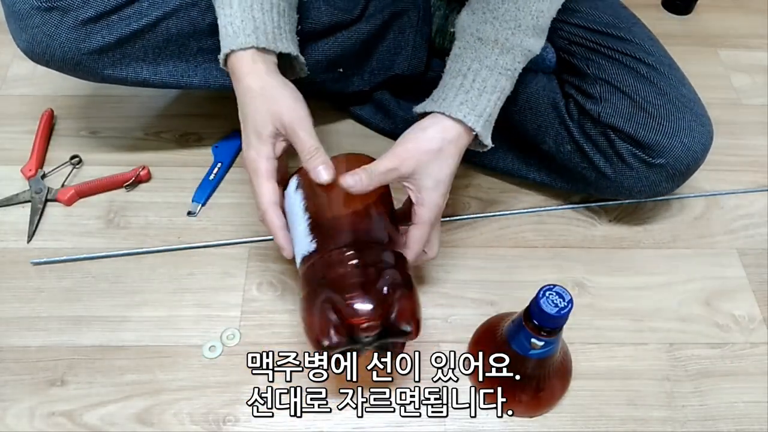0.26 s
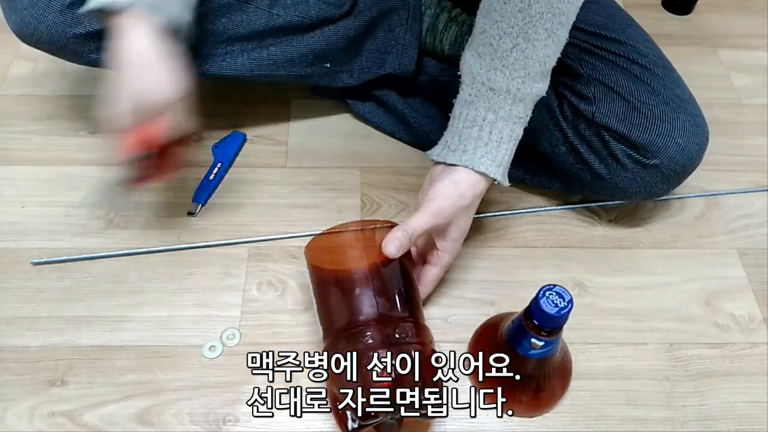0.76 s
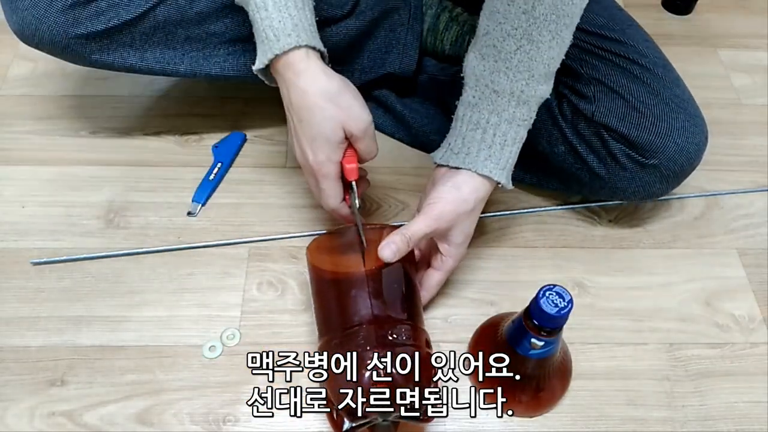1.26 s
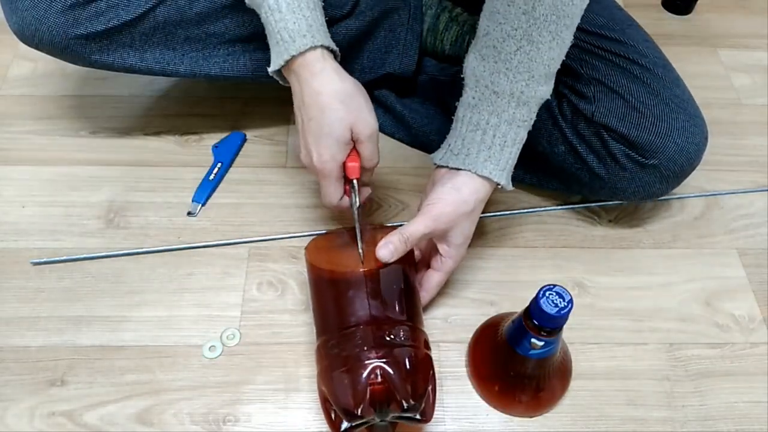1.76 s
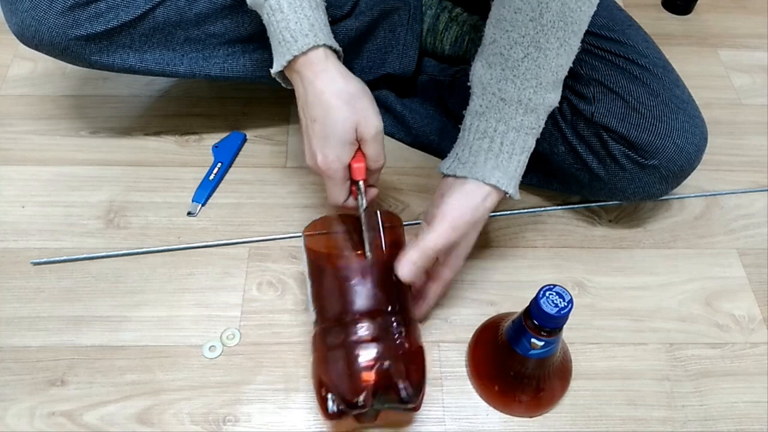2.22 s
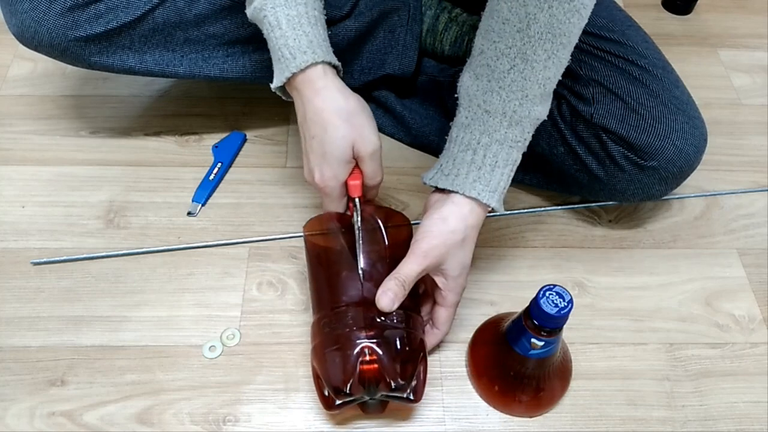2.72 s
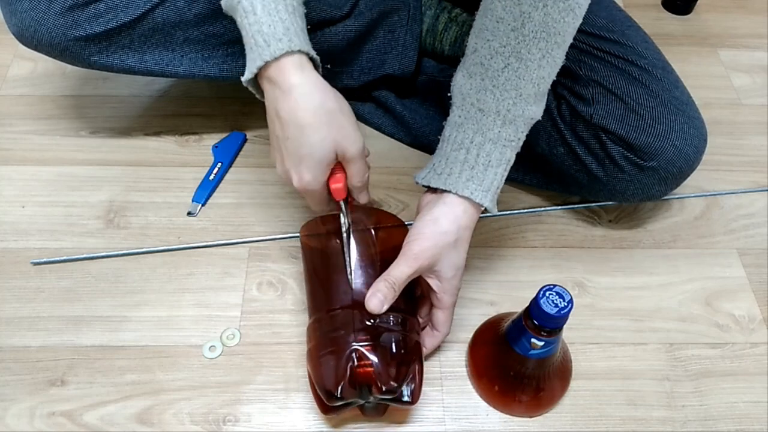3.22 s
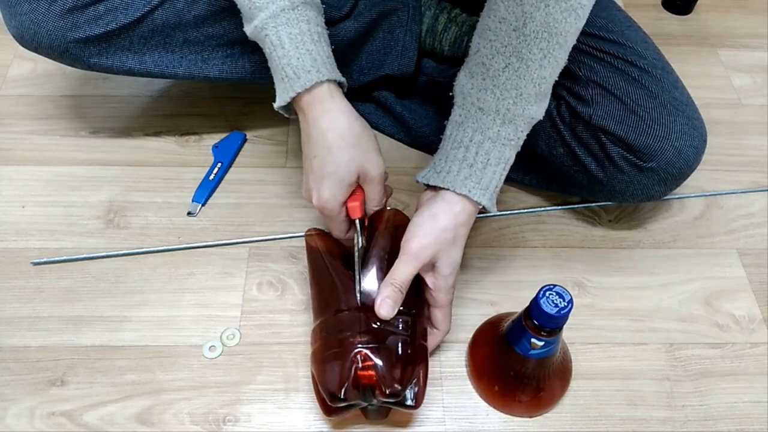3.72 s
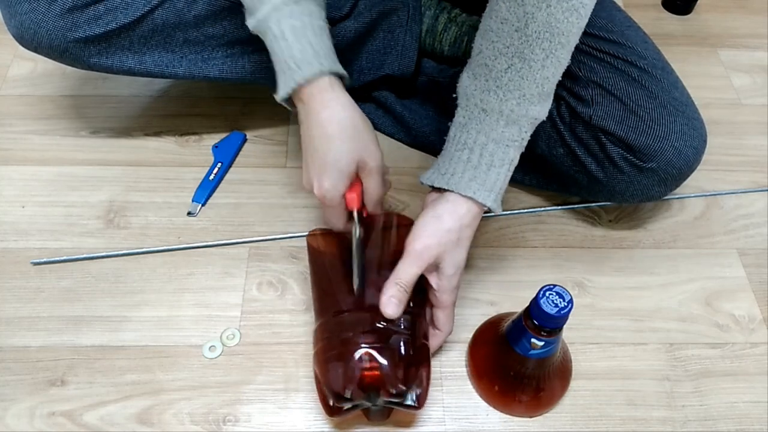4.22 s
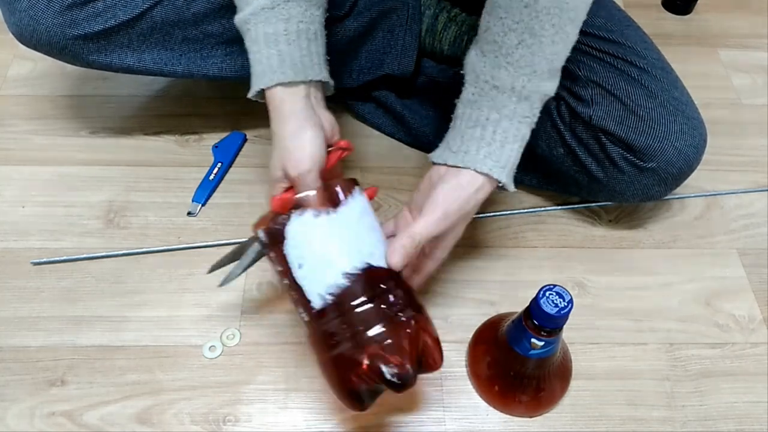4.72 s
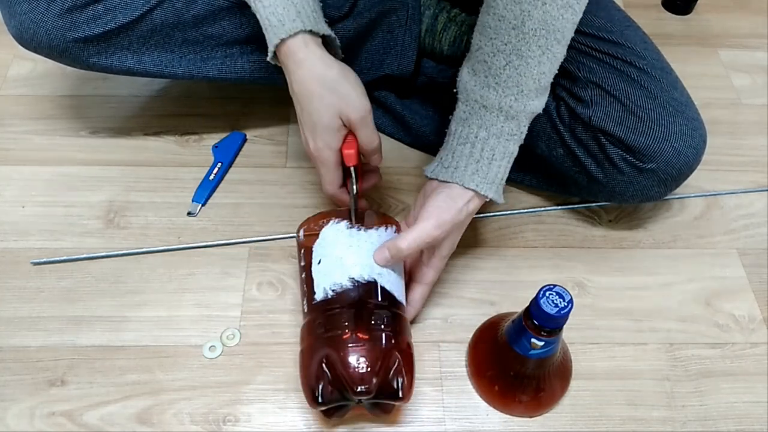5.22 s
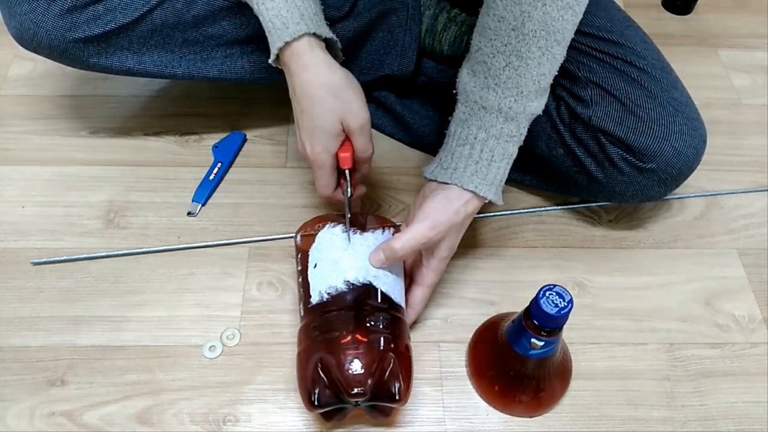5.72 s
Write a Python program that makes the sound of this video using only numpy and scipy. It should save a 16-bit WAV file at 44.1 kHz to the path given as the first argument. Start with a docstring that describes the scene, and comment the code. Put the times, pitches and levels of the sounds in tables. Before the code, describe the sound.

Shears clack, then tick and crackle through a hollow plastic bottle, ending in a hard snip before a second cut begins.

```python
"""A faint steady rush and hum come first, with a brief scuff; then shears clack and tap on plastic.
They slit an empty bottle lengthwise on the floor of a small room: slips tick at the blade and ring the air.
The thin wall snaps and crackles in noisy bursts shaped by its resonances, and sliding is catches over hiss.
A hard snip ends the cut; the shears are pulled out, the bottle is turned over and a second cut begins.
Levels are relative: layer gains follow in scene(). Short sounds are levelled by energy over one millisecond."""
import sys
import numpy as np
from scipy import signal
from scipy.fft import rfft, irfft, next_fast_len
from scipy.io import wavfile
from scipy.ndimage import uniform_filter1d

SR = 44100
rng = np.random.default_rng(int(sys.argv[2]) if len(sys.argv) > 2 else 0)


def put_to_file(sound):
    """Save the sound as 16-bit audio at rate SR, in the file named by the first command-line argument."""
    columns = np.atleast_2d(sound).T  # one column per channel
    safe = np.clip(columns, -1, 1)
    whole_steps = np.round(safe * 32767)
    wavfile.write(sys.argv[1], SR, whole_steps.astype(np.int16))


N = 263277
RING_SAMPLES = 6000  # length of every ring


def from_db(db):
    """Decibels to gain."""
    return 10 ** (np.asarray(db) / 20)


def unit(x):
    """Scale to an energy of one."""
    return x / np.sqrt(np.sum(x ** 2, axis=-1, keepdims=True) + 1e-20)


def at_hz(points, hz, axis=1):
    """Read a column of a table on a log-frequency axis."""
    points = np.array(points)
    return np.interp(np.log(hz + 1e-9), np.log(points[:, 0]), points[:, axis])


def band(x, low_hz, high_hz, order=3):
    """Causal band-pass."""
    edges_hz = [low_hz, min(high_hz, SR / 2 - 1000)]
    return signal.sosfilt(signal.butter(order, edges_hz, "band", fs=SR, output="sos"), x + 1e-18)


def stereo(mid, side, alike):
    """Two channels with a given correlation from two unrelated noises."""
    alike = np.clip(alike, -1, 1)
    return np.sqrt((1 + alike) / 2) * mid + np.sqrt((1 - alike) / 2) * side * np.array([[1], [-1]])


def aimed(x, lag_samples=.82, scatter_samples=.48):
    """Each contact radiates from its own spot and usually reaches the left side slightly later."""
    size = next_fast_len(len(x))
    lag = lag_samples + scatter_samples * rng.standard_normal()
    turns = np.arange(size // 2 + 1) / size * lag
    left = irfft(rfft(x, size) * np.exp(-2j * np.pi * turns), size)
    return np.array([left[:len(x)], x])


def add(out, s, sound):
    """Mix a sound into both channels at a time."""
    start = min(max(round(s * SR), 0), N)
    out[:, start:start + len(sound)] += aimed(sound)[:, :N - start]


def ringing(modes):
    """Damped waves of a set of modes after one push."""
    t = np.arange(RING_SAMPLES) / SR
    return sum(from_db(db - 60 * t / t60) * np.cos(2 * np.pi * hz * t) for hz, db, t60 in modes)


def panel(x, hz, lift_db, width):
    """The patch of wall under the contact lifts its own pitch; width is a share of that pitch."""
    r = np.exp(-np.pi * width * hz / SR)
    peak = np.array([1, 0, -1]) * (1 - r * r) / 2
    ring = signal.lfilter(peak, [1, -2 * r * np.cos(2 * np.pi * hz / SR), r * r], x)
    return x + (from_db(lift_db) - 1) * ring


PIVOT_HZ = 4400  # tilt leans the sound about this pitch


def tilted(level_db, tilt_db, parts):
    """Levels of the bottle's parts: a sharp contact favours the high ones, a blunt one the low."""
    power = np.abs(rfft(np.array(parts))) ** 2
    centre_hz = power @ np.linspace(0, SR / 2, power.shape[1]) / power.sum(axis=1)
    return level_db + tilt_db * np.log2(centre_hz / PIVOT_HZ)


# a burst is one clean push below this pitch and a flurry above it
SPLIT_HZ = 2300
LOWS, HIGHS = (signal.butter(5, SPLIT_HZ, kind, fs=SR, output="sos") for kind in ("low", "high"))


def burst(rise_ms):
    """The wall lets go: one clean push in the lows, a swelling and dying flurry of noise above."""
    size = 1024
    age = np.arange(size) * 1000 / SR / max(rise_ms, .1)  # in rise times
    spectrum = rfft(rng.standard_normal(size) * age * np.exp(-age), 2 * size)
    # even out the spectrum so that the resonances alone colour it
    smooth_power = uniform_filter1d(np.abs(spectrum) ** 2, size=15)
    flurry = unit(irfft(spectrum / np.sqrt(smooth_power + 1e-12))[:size])
    push = signal.unit_impulse(size, int(np.argmin(np.abs(age - 1)))) * rng.choice([-1, 1])
    jolt = signal.sosfilt(LOWS, push) + signal.sosfilt(HIGHS, flurry)
    return jolt * np.sqrt(SR / 1000)


def strike(rise_ms, levels_db, parts):
    """One burst drives several parts of the bottle."""
    return signal.fftconvolve(burst(rise_ms), from_db(levels_db) @ np.array(parts))


SNAP_RISE_MS = 0.42
# every snap or knock sets off a few weaker ones in neighbouring patches of wall
AFTER_GAP_S, AFTER_LOSS_DB, AFTER_OCTAVES = .007, 3, 0.37


def settling(s, hz, levels_db, parts, count=3):
    """The dying crackle of the wall after a jolt: rows of (time [s], sound)."""
    delays_s = np.cumsum(rng.exponential(AFTER_GAP_S, count))
    patches_hz = hz * 2 ** (AFTER_OCTAVES * rng.uniform(-1.4, 1, count))
    rows = []
    for k, (delay_s, patch_hz) in enumerate(zip(delays_s, patches_hz)):
        crackle = strike(SNAP_RISE_MS, levels_db - AFTER_LOSS_DB * k, parts)
        rows.append((s + delay_s, panel(crackle, patch_hz, lift_db=3.0, width=0.035)))
    return rows


# air in the open bottle: (frequency [Hz], level [dB], t60 [s])
HOLLOW_MODES = [(925, -11.5, 0.082), (1044, -14.5, 0.063), (1135.5, 0.5, 0.082), (1179, 1, 0.0352),
                (1249, -3, 0.056), (1294, -9.5, 0.06), (1410, -23, 0.12), (965, -3.5, 0.021)]
# the curved wall: (frequency [Hz], level [dB], t60 [s])
WALL_MODES = [(1456, -24, 0.096), (1570, -26.5, 0.062), (1743, -20.5, 0.069), (1954, -29.5, 0.065),
              (2080, -31, 0.084), (2385, -29.5, 0.057)]


def bottle():
    """Unit-energy answers to one push: thud, hollow air, wall, crack, fizz, and a treble mix of the last two."""
    push = signal.unit_impulse(RING_SAMPLES)
    thud = unit(band(push, 360, 630, order=1))
    hollow = band(ringing(HOLLOW_MODES), 600, 1500, order=2)
    wall_ring = band(ringing(WALL_MODES), 960, 5800, order=2)
    wall = unit(band(push, 1230, 3610) + from_db(-26.5) * wall_ring)
    crack = band(push, 3840, 8020)
    fizz = band(push, 9240, 14120)
    treble = unit(crack) + from_db(-4.0) * unit(fizz)
    return unit(np.array([thud, hollow, wall, crack, fizz, treble]))


# the whole shell, knocked from outside: (frequency [Hz], level [dB], t60 [s])
SHELL_MODES = [(649, -11, 0.031), (924, -7.5, 0.074), (1360, -16, 0.029), (890, 14, 0.0029)]


def shell_ring():
    """The whole shell answers a push from outside with a low, woody knock."""
    return unit(band(ringing(SHELL_MODES), 574, 1310, order=2))


# spectrum of the steady rush: (frequency [Hz], density [dB per Hz, relative])
RUSH_SPECTRUM = [(15, -69.5), (25, -44), (118, -18), (166, -5.5), (260, -3.5), (477, -9.5), (516, -3.5),
                 (573, -13), (786, -9), (851, -15.5), (1050, -9), (1690, -18.5), (1980, -18.5),
                 (3170, -21.5), (13500, -32.5)]
# left-right likeness of the rush: (frequency [Hz], correlation [-1 to 1])
RUSH_LIKENESS = [(50, .2), (130, 0.332), (280, 0.26), (600, 0.54), (1200, 0.547), (3000, 0.095),
                 (10000, 0.11)]
# faint hum lines: (frequency [Hz], level [dB])
HUM = [(224, -82.5), (255, -76), (511, -75.5)]


def background(rush_db, hum_db, waver):
    """A soft steady rush of shaped noise with a hum whose phase wanders slightly."""
    hz = np.arange(N // 2 + 1) * SR / N
    mid, side = rfft(rng.standard_normal((2, N))) * from_db(at_hz(RUSH_SPECTRUM, hz))
    rush = unit(irfft(stereo(mid, side, at_hz(RUSH_LIKENESS, hz)), N)) * np.sqrt(N)
    t = np.arange(N) / SR
    hum = 0
    for line_hz, db in HUM:
        wander = waver * np.cumsum(rng.standard_normal(N)) / np.sqrt(SR)
        hum = hum + from_db(db) * np.sqrt(2) * np.sin(2 * np.pi * line_hz * t + wander)
    return from_db(rush_db) * rush + from_db(hum_db) * hum


# steel or fingers slide over plastic:
# (start [s], end [s], level [dB], tilt [dB per octave], panel pitch [Hz])
RUBS = [(0, 0.011, -61.5, 1.5, 1670), (0.237, 0.262, -72, -2.5, 2060), (0.345, 0.516, -76.5, 2, 1540),
        (0.66, 0.749, -78, 0.5, 1930), (1.844, 1.857, -61, 1, 1410), (1.857, 1.95, -60.5, -1, 1410),
        (1.95, 1.98, -62.5, 1.5, 3200), (2.256, 2.367, -69, -0.5, 1870), (2.417, 2.535, -59.5, -1.5, 1890),
        (2.659, 2.71, -59, 2, 8600), (2.849, 2.939, -61, -1, 1715), (3.16, 3.265, -59.5, 0.5, 4300),
        (3.287, 3.301, -55.5, 1, 5230), (3.3, 3.367, -64.5, -0.5, 1500), (3.395, 3.44, -53.5, 3.5, 1670),
        (3.478, 3.524, -59, -1, 2155), (3.894, 3.959, -71.5, 5, 9300), (4.265, 4.33, -50.5, 4.5, 7230),
        (4.511, 4.596, -66, 2.5, 1502), (4.61, 4.744, -65.5, -0.5, 3280), (4.791, 4.853, -68.5, 1.5, 3910),
        (4.904, 4.983, -67.5, 1, 3890), (4.982, 5.006, -54.5, 4.5, 7000), (5.574, 5.615, -69.5, 2.5, 1527)]
# low friction hiss under a squeeze: level against its last slip [dB], tilt [dB per octave]
SQUEEZE_HISS_DB, SQUEEZE_HISS_TILT_DB = -29.5, -0.5
# a sliding contact moves on to a new patch of wall every so often, a little higher or lower in pitch
PATCH_S, PATCH_OCTAVES = .018, 0.242


def scrapes(parts, grains_per_s, spread_db, smooth_share, fade_s):
    """Sliding contact: dense uneven catches over a smooth friction hiss."""
    out = np.zeros((2, N))
    sizes = from_db(spread_db * np.minimum(rng.exponential(1, N), 3)) * rng.choice([-1, 1], N)
    catches = unit(sizes * (rng.random(N) < grains_per_s / SR))
    friction = catches + smooth_share * unit(rng.standard_normal(N))
    t = np.arange(N) / SR
    closing_blades = [(start, end, db + SQUEEZE_HISS_DB, SQUEEZE_HISS_TILT_DB, BLADE_MODES[0][0])
                      for start, end, db, _ in SQUEEZES]
    for start, end, level_db, tilt_db, hz in RUBS + closing_blades:
        first = max(round((start - fade_s / 2) * SR), 0)
        during = slice(first, max(round((end + fade_s / 2) * SR), first + 2))
        to_edge_s = np.minimum(t[during] - start, end - t[during])
        pressure = np.clip(to_edge_s / fade_s + .5, 0, 1)
        stroke = unit(friction[during] * pressure) * np.sqrt(pressure.sum())
        answer = from_db(tilted(level_db, tilt_db, parts)) @ np.array(parts)
        size = round(PATCH_S * SR)
        for at in range(0, len(stroke), size):
            rub = signal.fftconvolve(stroke[at:at + size], answer)
            patch_hz = hz * 2 ** (PATCH_OCTAVES * rng.uniform(-0.96, 1))
            add(out, (first + at) / SR, panel(rub, patch_hz, lift_db=11.5, width=0.03))
    return out


# reflections from floor and room against the direct sound: (frequency [Hz], level [dB], t60 [s])
ROOM = [(199, -24.5, 0.18), (594, -5.5, 0.15), (1170, -5.5, 0.069), (2240, -1.5, 0.076), (4500, -3.5, 0.12),
        (8040, -2, 0.09), (15000, -1, 0.12)]
# left-right likeness of the reflections: (frequency [Hz], correlation [-1 to 1])
ROOM_LIKENESS = [(200, 0.36), (1000, 0.95), (2200, 0.13), (5000, 0.018), (12000, 0.029)]
SWAY_S = .9  # the bottle sways in the hand once in this time


def room(x, late_db, late_t60, build_s, count=4):
    """Dense close reflections die fast and a faint tail lingers; their pattern shifts as the bottle sways."""
    t = np.arange(SR // 3) / SR
    edges = np.geomspace(150, 17000, 15)
    answers = 0
    for low, high in zip(edges, edges[1:]):
        hz = np.sqrt(low * high)
        decay = from_db(-60 * t / at_hz(ROOM, hz, axis=2)) + from_db(late_db - 60 * t / late_t60)
        envelope = decay * (1 - np.exp(-t / build_s))
        mid, side = unit(band(rng.standard_normal((2, count, 1, len(t))) * envelope, low, high))
        gain = from_db(at_hz(ROOM, hz)) * np.sqrt(2 * (high - low) / SR)
        answers = answers + gain * stereo(mid, side, at_hz(ROOM_LIKENESS, hz))
    sway = np.arange(N) / SR / SWAY_S
    out = 0
    for k, answer in enumerate(answers):
        share = np.maximum(np.cos(2 * np.pi * (sway - k / count)), 0)
        out = out + signal.oaconvolve((x * share)[None], answer, axes=1)[:, :N]
    return out


# the shears clack as they are picked up, shut or knocked against the bottle:
# (time [s], level [dB], tilt [dB per octave], panel pitch [Hz])
KNOCKS = [(0.5136, -39.5, 2, 1600), (0.527, -49.5, 6, 3300), (0.5885, -40, -0.5, 1760),
          (0.607, -50, 0.5, 2150), (0.673, -46.5, 1.5, 1930), (0.688, -56, 3, 2900), (0.699, -50, 1, 2000),
          (0.744, -53, 2, 2300), (4.621, -50, -4, 1490), (4.6431, -36.5, 2.5, 1670), (4.684, -36, 3, 3620),
          (4.7145, -38, 4.5, 3955), (4.9208, -45.5, 12.5, 3760), (4.943, -45.5, 2.5, 1720),
          (4.993, -27.5, 0.5, 1460), (4.997, -30.5, 7, 3350), (5.0666, -37.5, 2.5, 1740),
          (5.591, -58, -8, 953)]


def knocks(thud, wall, treble, rise_ms, shell_db, settle_db):
    """Hard clacks of tool and bottle: a burst through thud, shell, wall and treble, then a short rattle."""
    out = np.zeros((2, N))
    parts = [thud, from_db(shell_db) * shell_ring(), wall, treble]
    for s, level_db, tilt_db, hz in KNOCKS:
        levels_db = tilted(level_db, tilt_db, parts)
        add(out, s, panel(strike(rise_ms, levels_db, parts), hz, lift_db=12.5, width=0.13))
        for later_s, rattle in settling(s, hz, levels_db[2:] + settle_db, parts[2:]):
            add(out, later_s, rattle)
    return out


def pings(table):
    """Single damped modes, each band-passed an octave either side of its pitch."""
    out = np.zeros((2, N))
    for s, hz, db, t60 in table:
        add(out, s, band(ringing([(hz, db, t60)]), hz / 2, hz * 2, order=2))
    return out


# soft bumps against the floor: (time [s], frequency [Hz], level [dB], t60 [s])
BUMPS = [(0.59, 185, -54, 0.15), (2.305, 159, -63, 0.11), (3.155, 476, -38.5, 0.014),
         (4.646, 184, -51, 0.026), (4.996, 390, -46.5, 0.033)]


def bumps():
    """The floor answers dully with one low damped mode."""
    return pings(BUMPS)


# an edge chatters as it is dragged and keeps one spot ringing:
# (start [s], end [s], level [dB], frequency [Hz], width [Hz])
RASPS = [(0.668, 0.738, -64, 1980, 800), (2.431, 2.486, -61.5, 5070, 300), (2.485, 2.563, -65, 1900, 600),
         (4.268, 4.284, -38, 6700, 800)]


def rasps(catches_per_s, spread_db):
    """Dense uneven catches into one resonance, strongest midway through the drag."""
    out = np.zeros((2, N))
    for start, end, level_db, hz, width_hz in RASPS:
        chance = rng.random(RING_SAMPLES)
        size_db = spread_db * rng.standard_normal(RING_SAMPLES)
        progress = np.minimum(np.arange(RING_SAMPLES) / SR / (end - start), 1)
        swell = np.sqrt(progress * (1 - progress))
        catches = from_db(size_db) * (chance < catches_per_s / SR) * swell
        rasp = unit(band(catches, hz - width_hz / 2, hz + width_hz / 2, order=1))
        add(out, start, from_db(level_db) * np.sqrt((end - start) * SR) * rasp)
    return out


# the taut plastic at the blade's edge: (frequency [Hz], level [dB], width [Hz])
BLADE_MODES = [(3050, -1, 680), (4925, -6, 640), (7600, -9.5, 2000), (12000, -10, 4300)]


def blade_edge(edge_hz, pitch_scatter, scatter_db=1.5):
    """Plastic at the blade's edge rings in a new mix each time; its lowest mode follows how taut it is."""
    push, out = signal.unit_impulse(RING_SAMPLES), 0
    pitches = [edge_hz] + [hz for hz, _, _ in BLADE_MODES[1:]]
    for hz, (_, db, width_hz) in zip(pitches, BLADE_MODES):
        centre_hz = hz * np.exp(pitch_scatter * rng.standard_normal())
        mode = unit(band(push, centre_hz - width_hz / 2, centre_hz + width_hz / 2, order=2))
        out = out + from_db(db + scatter_db * rng.standard_normal()) * mode
    return unit(out)


# the shears nudge the bottle: (time [s], level [dB])
TAPS = [(1.04, -43.5), (1.05, -47.5), (1.111, -52), (1.4778, -44), (2.334, -47.5), (2.438, -42.5),
        (2.5904, -47), (2.8393, -52.5), (3.101, -40.5), (3.31, -42.5), (4.2521, -50), (5.5812, -46.5),
        (5.589, -42.5)]


def taps(hollow, blade_db, rise_ms):
    """Light nudges with the blade's tip wake little but the air in the bottle."""
    out = np.zeros((2, N))
    for s, db in TAPS:
        parts = [hollow, blade_edge(BLADE_MODES[0][0], pitch_scatter=0.1)]
        add(out, s, strike(rise_ms, [db, db + blade_db], parts))
    return out


# the hand squeezes the shears, harder as they close:
# (start [s], end [s], last slip level [dB], swell [dB])
SQUEEZES = [(1.528, 1.758, -44, 7), (2.12, 2.25, -52, 2), (5.729, 5.97, -52.5, 2)]
# during a squeeze the blades stick and slip at an uneven pace; jitter is a share of the mean gap
SLIPS_PER_S, SLIP_JITTER, SLIP_SCATTER_DB, SLIP_OCTAVES = 80, 0.35, 2, 0.15
SMALL_EDGE_DB = -10  # a small slip drives the blade's edge this much more weakly than the air


def small_slips(count=24):
    """Each squeeze is an uneven run of slips growing with pressure: rows laid out as in SLIPS."""
    rows = []
    for start, end, last_db, swell_db in SQUEEZES:
        late, stronger, tauter = rng.uniform(-1, 1, (3, count))
        times = start + (np.arange(count) + SLIP_JITTER * late) / SLIPS_PER_S
        pressure_db = last_db - swell_db * (end - times) / (end - start)
        levels_db = pressure_db + SLIP_SCATTER_DB * stronger
        edges_hz = BLADE_MODES[0][0] * 2 ** (SLIP_OCTAVES * tauter)
        for s, db, hz in zip(times, levels_db, edges_hz):
            if s < end:
                rows.append((s, db + SMALL_EDGE_DB, db, hz))
    return rows


# a slip pushes the air gently and wakes mostly its main mode; the others lose level per octave of distance
MAIN_AIR_HZ, MAIN_AIR_T60_S, AIR_LOSS_DB_PER_OCTAVE = 1153, .055, 17


def air_ring(scatter_db, main_db=1.0):
    """The air in the bottle sings on its main mode; each spot on the wall adds a little of the others."""
    modes = []
    for hz, db, t60 in HOLLOW_MODES:
        loss_db = AIR_LOSS_DB_PER_OCTAVE * abs(np.log2(hz / MAIN_AIR_HZ))
        modes.append((hz, db - loss_db + scatter_db * rng.standard_normal(), t60))
    modes.append((MAIN_AIR_HZ, main_db, MAIN_AIR_T60_S))
    return unit(band(ringing(modes), 680, 1590, order=2))


# the slips that stand out: (time [s], edge level [dB], air level [dB], edge pitch [Hz])
SLIPS = [(1.548, -54, -52, 3000), (1.561, -54, -54, 2750), (1.573, -56, -51, 3130),
         (1.5923, -54, -54, 3500), (1.6223, -50, -51, 2920), (1.63, -50, -52, 3170),
         (1.6731, -50, -43, 2560), (1.691, -46.5, -36, 3150), (1.7043, -40, -35.5, 3080),
         (1.7144, -49, -39, 3100), (1.7295, -37.5, -38, 3150), (1.7496, -47, -41.5, 3070),
         (1.908, -55, -37, 2600), (1.918, -53, -41, 2400), (1.9652, -53, -44, 3380),
         (1.9735, -48.5, -43, 3100), (2.0446, -53, -48.5, 3140), (2.0877, -45, -44, 3100),
         (2.114, -39.5, -41, 3070), (2.129, -56, -43, 3100), (2.1366, -43, -35.5, 3170),
         (2.1536, -40.5, -46, 3210), (2.1711, -48, -42, 3150), (2.1995, -42, -42, 3600),
         (2.2023, -40, -40, 3300), (2.2177, -53, -40, 3330), (2.2613, -52.5, -49, 2890),
         (2.398, -55.5, -51, 3240), (5.7605, -53.5, -47, 3130), (5.8, -51, -40, 2970),
         (5.8095, -53, -44, 3100), (5.8515, -48.5, -47, 3190), (5.8718, -44.5, -46.5, 3160),
         (5.8976, -49, -44, 2750), (5.9086, -44.5, -46, 3380), (5.929, -46, -50, 2830),
         (5.9338, -39.5, -40, 3170), (5.9523, -42, -45, 3340)]


def cuts(rocking, air_db, blade_db, rise_ms):
    """The blades stick and slip through the wall: a short tick at their edge, a longer ring in the air."""
    out = np.zeros((2, N))
    for s, edge_db, ring_db, edge_hz in SLIPS + small_slips():
        parts = [air_ring(scatter_db=2.5) + rocking, blade_edge(edge_hz, pitch_scatter=0.024)]
        add(out, s, strike(rise_ms, [ring_db + air_db, edge_db + blade_db], parts))
    return out


# the wall buckles or cracks:
# (time [s], level [dB], tilt [dB per octave], panel pitch [Hz], extra level for the air inside [dB])
SNAPS = [(1.8546, -38, -1.5, 3620, -1.5), (1.9454, -51.5, -1.5, 1491, 4.5), (1.9974, -47.5, -4.5, 1790, 0),
         (2.5438, -43, -5, 2030, -4), (2.6789, -42.5, 5, 8000, -2), (2.7012, -40, 4, 3220, 4),
         (2.7203, -35, -2.5, 4920, 0), (2.7215, -30.5, 0, 4050, 1), (2.7415, -36.5, 0, 4180, 1.5),
         (2.7573, -28, 0.5, 3370, 6), (2.898, -47, 2, 9020, 7), (2.933, -47, 1, 4900, 2.5),
         (2.9928, -43, 1.5, 4400, -1), (3.0501, -50, 2.5, 2360, 5), (3.0969, -38, -2, 2400, 0),
         (3.109, -32, -1.5, 4430, -4.5), (3.1151, -33.5, -1, 3700, -5.5), (3.1533, -42.5, -0.5, 2170, 0.5),
         (3.1678, -44.5, 1, 5800, 5), (3.172, -43.5, 0.5, 6200, 4.5), (3.1773, -41.5, 7, 5520, 7),
         (3.1913, -46, 4, 6200, -1), (3.219, -39.5, 1, 3700, -10), (3.239, -39.5, 0, 4180, -10),
         (3.259, -46.5, -3, 2100, -1.5), (3.3652, -42, 0, 3130, 3), (3.3755, -35.5, 0.5, 7060, 2),
         (3.378, -34.5, -1.5, 1755, -0.5), (3.3825, -37, 1.5, 7200, 5), (3.399, -22.5, 1.5, 2000, 3),
         (3.405, -34.5, -1, 3740, -7), (3.4822, -40.5, -2.5, 2270, -5.5), (3.583, -53, 2, 2020, 6.5),
         (3.6119, -26, 5.5, 6860, 2.5), (3.6962, -47.5, 6.5, 7660, 5), (3.815, -44, 4.5, 7300, 3),
         (3.827, -49.5, 3, 7540, -4), (3.8788, -55.5, 8.5, 7760, 3), (3.907, -60, 10.5, 9500, 0),
         (3.923, -57, 11.5, 9000, 0), (3.9932, -29, 0.5, 1850, -6), (4.067, -48, 1.5, 2180, 1.5),
         (4.142, -54.5, 6.5, 7100, -2), (4.2697, -31, 2, 2860, -1.5), (4.272, -24, 4.5, 6550, 0),
         (4.3225, -41, 0, 2123, -0.5)]


def snaps(parts, swell_db, swell_ms, settle_db):
    """A faint short swell leads into one sharp crack, then a dying crackle."""
    out = np.zeros((2, N))
    for s, level_db, tilt_db, hz, air_db in SNAPS:
        levels_db = tilted(level_db, tilt_db, parts)
        levels_db[0] += air_db
        # the swell leaves out the air part
        swell = from_db(swell_db) * strike(swell_ms, levels_db[1:], parts[1:])
        add(out, s - 2 * swell_ms / 1000, swell)
        add(out, s, panel(strike(SNAP_RISE_MS, levels_db, parts), hz, lift_db=9.5, width=0.12))
        for later_s, crackle in settling(s, hz, levels_db[1:] + settle_db, parts[1:]):
            add(out, later_s, crackle)
    return out


# bursts of dense tiny cracks, as the plastic splits or rattles after the snip:
# (start [s], end [s], level [dB], tilt [dB per octave], panel pitch [Hz])
CRACK_RUNS = [(3.175, 3.198, -48.5, 0, 6150), (3.221, 3.234, -40, 4, 4050), (3.236, 3.249, -59, 0, 4300),
              (3.373, 3.389, -42, -2.5, 3020), (4.178, 4.2, -38, 2, 4100), (4.279, 4.309, -44.5, 4, 7500)]
# pace of the tiny cracks and their spread in level and pitch
CRACKS_PER_S, CRACK_SCATTER_DB, CRACK_OCTAVES = 420, -2.5, 0.28


def crack_runs(parts, rise_ms, count=24):
    """Dense runs of tiny cracks, each with a pitch of its own, strongest midway."""
    out = np.zeros((2, N))
    for start, end, level_db, tilt_db, hz in CRACK_RUNS:
        late, stronger, higher = rng.uniform(-1, 1, (3, count))
        times = start + (np.arange(count) + .5 + .5 * late) / CRACKS_PER_S
        grains = zip(times[times < end], CRACK_SCATTER_DB * stronger, CRACK_OCTAVES * higher)
        for s, extra_db, octaves in grains:
            swell = np.sqrt(np.sin(np.pi * (s - start) / (end - start)))
            crack = swell * strike(rise_ms, tilted(level_db + extra_db, tilt_db, parts), parts)
            add(out, s, panel(crack, hz * 2 ** octaves, lift_db=9.0, width=0.069))
    return out


# the steel blades ping: (time [s], frequency [Hz], level [dB], t60 [s])
STEEL_RINGS = [(3.226, 4250, -44, .09), (3.229, 4560, -52, 0.11), (4.686, 4780, -55, .09),
               (4.706, 3990, -53, 0.064)]


def steel():
    """The blades ping briefly on one damped mode when they jump free."""
    return pings(STEEL_RINGS)


SNIP_S, SNIP_DB = 4.1777, -16.5  # the blades snap shut at the end of the cut
# the short, hard crack of steel on steel: (frequency [Hz], level [dB], t60 [s])
SNIP_MODES = [(1155, -7, 0.006), (1600, -1, 0.007), (3000, -4.5, 0.0023), (4150, -1, 0.0033),
              (6100, 0.5, .002), (7300, 2.5, 0.0033), (11500, 0, .0007)]
# the blades bounce and crack once more: delay, level against the first crack
SNIP_BOUNCE_S, SNIP_BOUNCE_DB = .0003, -3


def snip(body, air_db, wall_db, settle_db):
    """The blades close in one hard crack and bounce into a second; air and wall ring on, then it crackles."""
    out = np.zeros((2, N))
    crack = unit(band(ringing(SNIP_MODES), 450, 16000, order=2))
    wall = unit(band(ringing(WALL_MODES), 1000, 3000, order=2))
    shut = crack + from_db(air_db) * body + from_db(wall_db) * wall
    add(out, SNIP_S, from_db(SNIP_DB) * np.sqrt(SR / 1000) * shut)
    add(out, SNIP_S + SNIP_BOUNCE_S, strike(SNAP_RISE_MS / 2, [SNIP_DB + SNIP_BOUNCE_DB], [crack]))
    for later_s, crackle in settling(SNIP_S, PIVOT_HZ, np.array([SNIP_DB + settle_db]), [crack]):
        add(out, later_s, crackle)
    return out


def scene():
    """All the handling sounds through one bottle, a little right of centre, over the steady background."""
    thud, hollow, wall, crack, fizz, treble = bottle()
    rocking = from_db(-20.5) * thud  # the bottle rocks a little on the floor as it rings
    body = hollow + rocking
    still_air = background(rush_db=-65.0, hum_db=-4.5, waver=3.91) * from_db([[-1.4], [1.2]])

    slide_parts = [body, from_db(-1.5) * shell_ring(), from_db(-1.5) * wall, treble]
    sliding = from_db(-2.5) * scrapes(slide_parts, grains_per_s=520, spread_db=3.5,
                                      smooth_share=0.68, fade_s=0.008)
    clacking = knocks(from_db(-23.5) * thud, from_db(-7) * wall, from_db(-13) * treble,
                      rise_ms=0.6, shell_db=-7.0, settle_db=-14.5)
    handling = from_db(-1.0) * (clacking + bumps())
    rasping = rasps(catches_per_s=600, spread_db=5.0)
    tapping = taps(from_db(2.0) * body, blade_db=-14.0, rise_ms=0.82)
    cutting = cuts(rocking, air_db=-2.3, blade_db=-0.5, rise_ms=0.45)
    snap_parts = [from_db(4.0) * body, from_db(-1.0) * wall, crack, from_db(-6) * fizz]
    buckling = from_db(-3.5) * snaps(snap_parts, swell_db=-8.5, swell_ms=0.9, settle_db=-17.0)
    crack_parts = [from_db(-2) * body, from_db(2.0) * wall, crack, from_db(-10.5) * fizz]
    crackling = from_db(-1.0) * crack_runs(crack_parts, rise_ms=0.2) + steel()
    shutting = snip(body, air_db=-8.0, wall_db=-14.0, settle_db=-20.5)

    direct = sliding + handling + rasping + tapping + cutting + buckling + crackling + shutting
    sound = direct + room(direct[1], late_db=-19.5, late_t60=0.26, build_s=0.00032)
    return sound * from_db([[-.9], [.9]]) + still_air


CUTOFF_HZ = 16200


def record(dry):
    """The top is cut steeply by an elliptic low-pass."""
    return signal.sosfilt(signal.ellip(10, .1, 80, CUTOFF_HZ, fs=SR, output="sos"), dry)


dry = scene()
out = record(dry)
put_to_file(out)
```